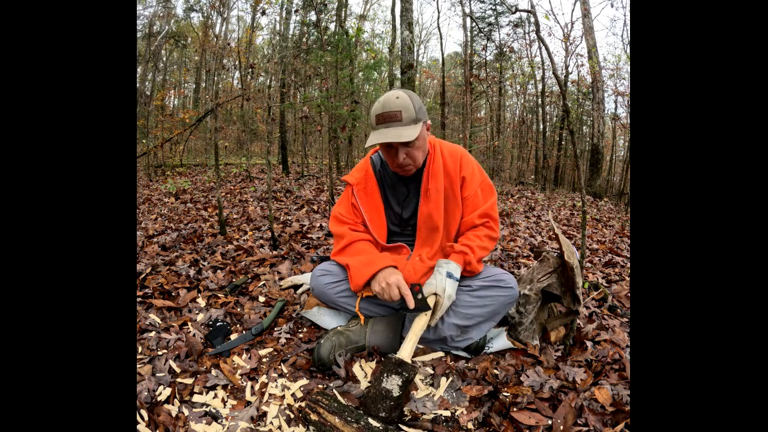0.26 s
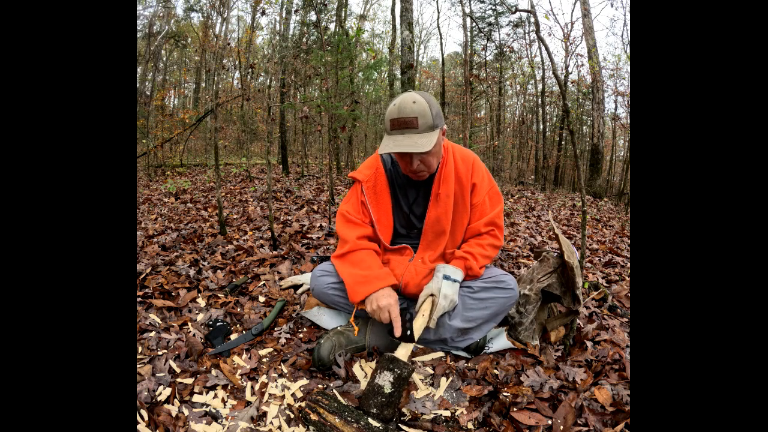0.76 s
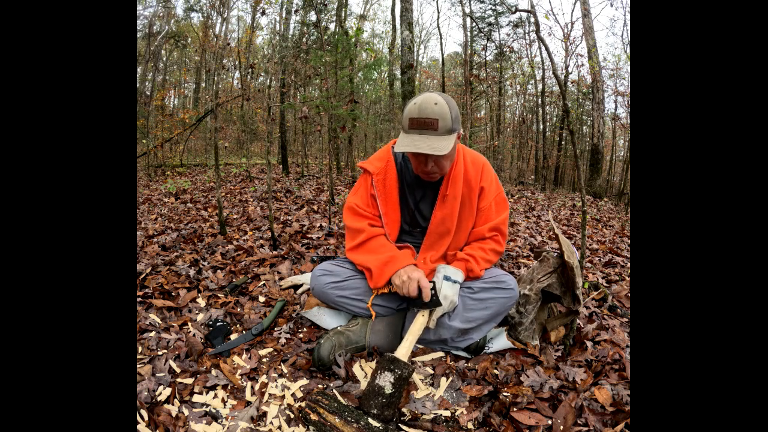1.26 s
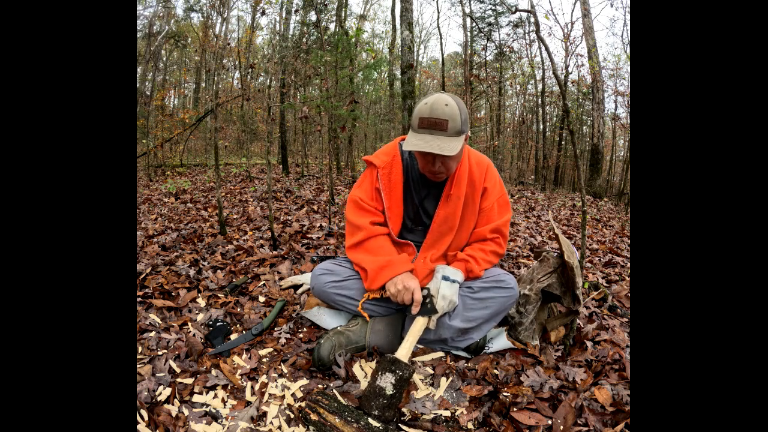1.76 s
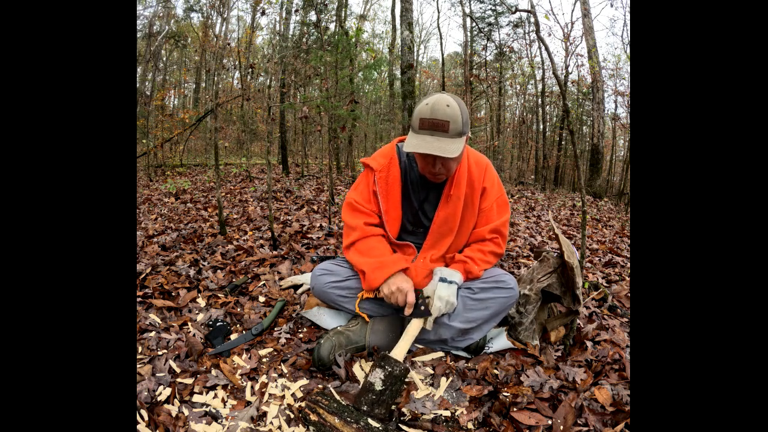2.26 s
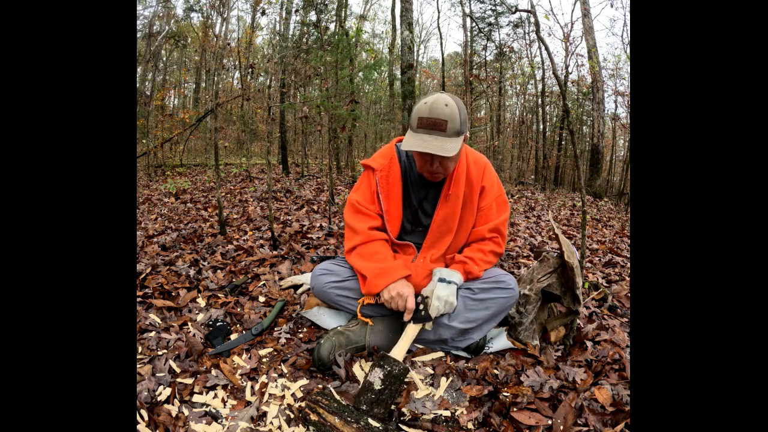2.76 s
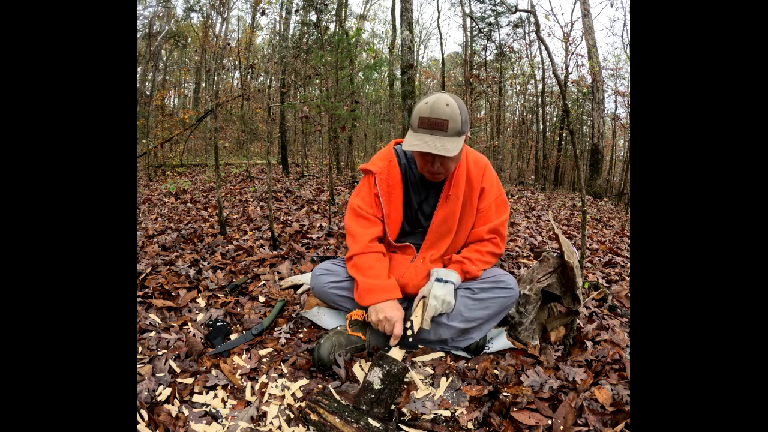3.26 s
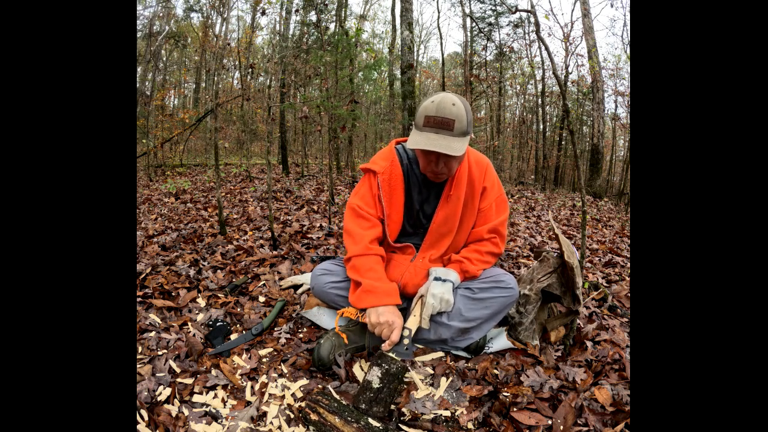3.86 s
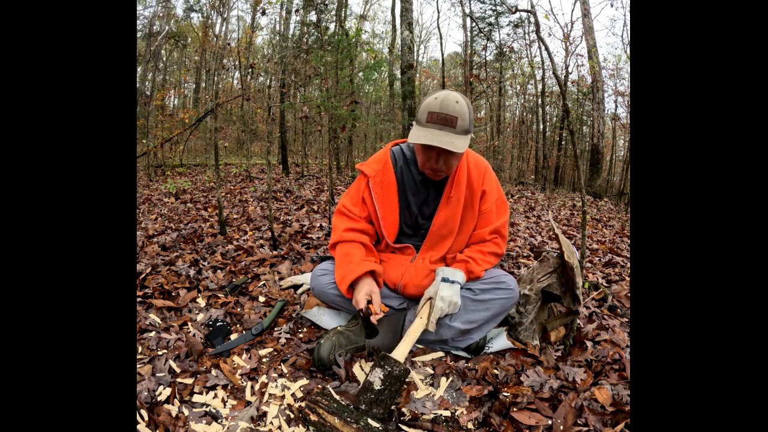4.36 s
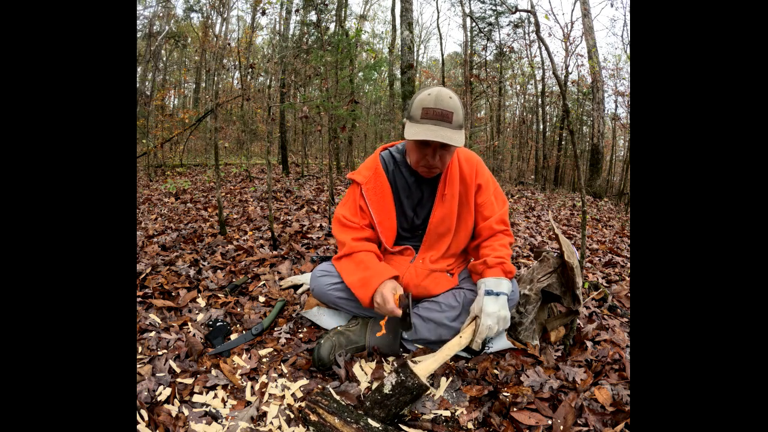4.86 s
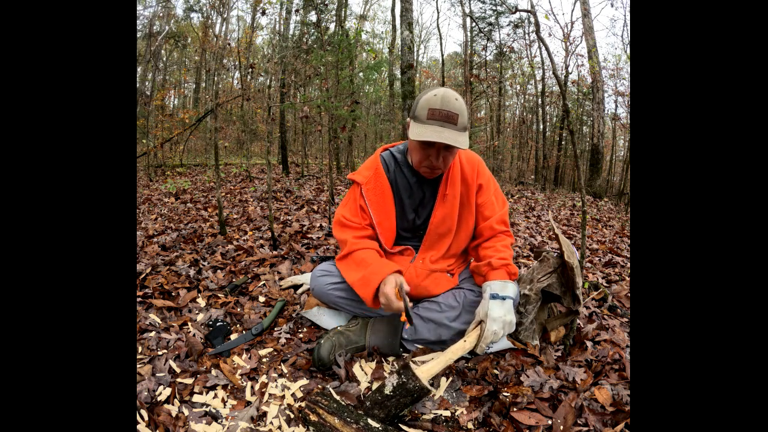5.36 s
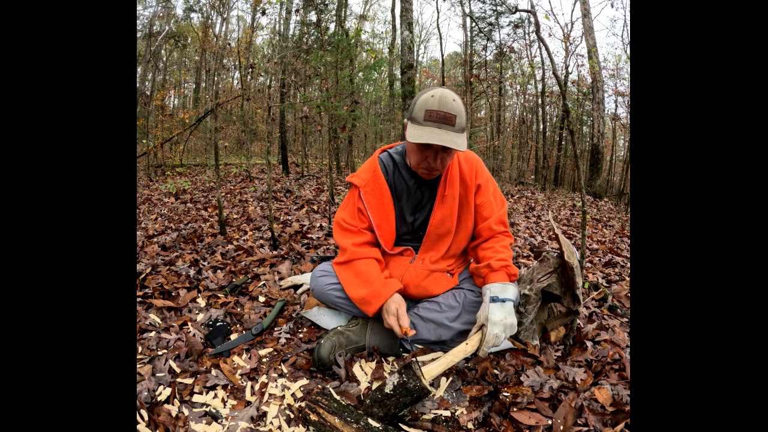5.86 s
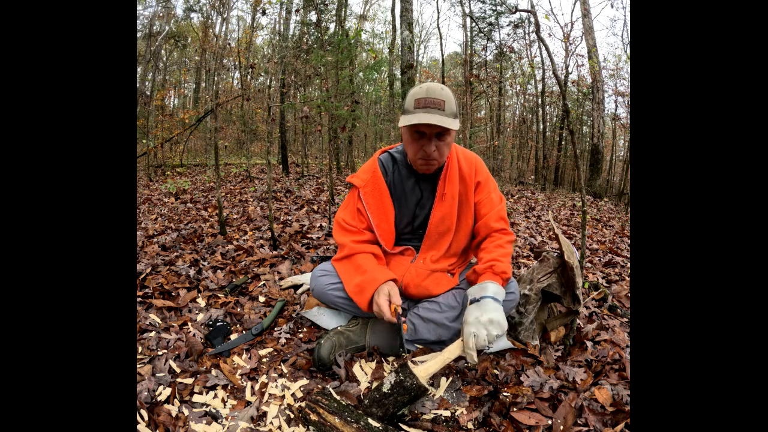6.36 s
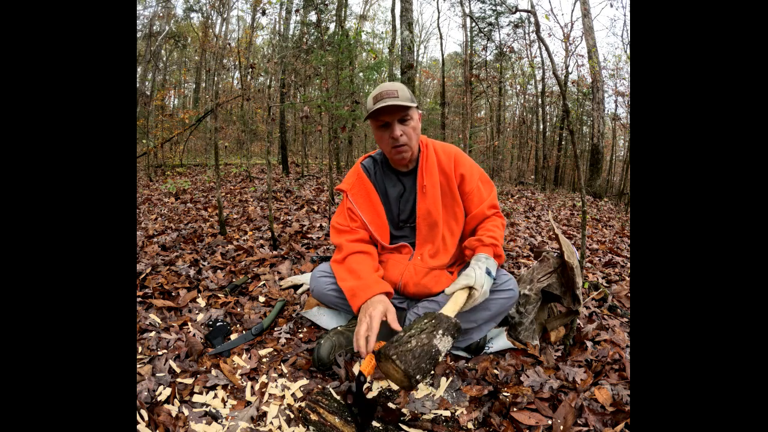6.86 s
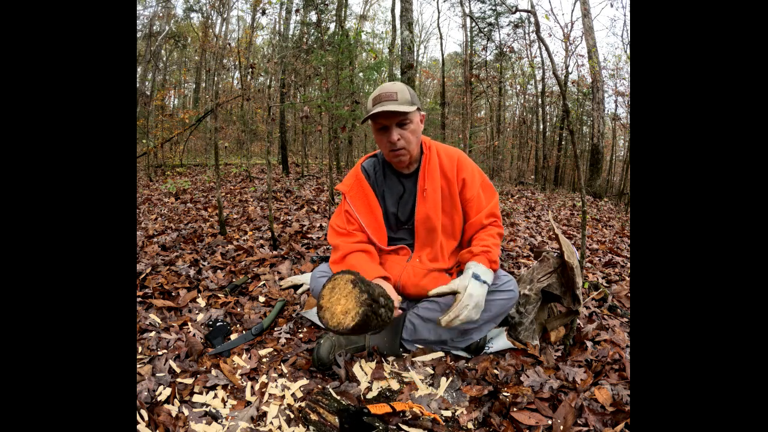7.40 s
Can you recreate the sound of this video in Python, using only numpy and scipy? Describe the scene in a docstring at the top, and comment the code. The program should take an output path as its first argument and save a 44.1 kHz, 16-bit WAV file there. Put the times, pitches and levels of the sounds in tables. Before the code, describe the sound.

Outdoors in still woods with no echo, a small hatchet taps a hardwood billet, then shaves it in short, gritty strokes with a faint steely ring. Sleeves and dry leaves rustle between moves. The strokes quicken and end in a metallic tick, the billet scuffs and bumps, a dry click leads into four chops, the middle two heaviest, and finally the lifted billet knocks. Close, dry pickup straight ahead.

```python
"""Hatchet on a billet in quiet woods

Someone sitting in fallen leaves works a hardwood billet with a small hatchet: light taps, short
shaving strokes, then a few chops. Blows ring damped modes of wood and steel and excite filtered
crackle; strokes do the same with fibres snapping in bunches. Filtered grains make the rustle of sleeves
and leaves, steady noise the hush of the woods. At the end the hatchet is put down and the billet knocks
as it is lifted."""
import sys
import numpy as np
from scipy import signal
from scipy.fft import rfft, irfft, next_fast_len
from scipy.io import wavfile
from scipy.ndimage import uniform_filter1d, minimum_filter1d

SR = 44100
rng = np.random.default_rng(int(sys.argv[2]) if len(sys.argv) > 2 else 0)


def unload_audio(sound):
    """Save the sound as a 16-bit wav file, at the path given as the first command line argument."""
    columns = np.transpose(np.atleast_2d(sound))
    # keep every value between -1 and 1, then stretch to whole-number steps
    steps = np.round(np.clip(columns, -1, 1) * 32767)
    wavfile.write(sys.argv[1], SR, steps.astype(np.int16))


N = 336483
TIME = np.arange(N) / SR
AGE = TIME[:SR // 4]  # seconds since a blow or stroke began


def from_db(db):
    """Decibels to an amplitude factor."""
    return 10 ** (np.asarray(db) / 20)


def rms_one(x):
    """Scale a sound to an RMS of one."""
    return x / np.sqrt(np.mean(x ** 2) + 1e-20)


def colour(x, spectrum):
    """Causal (minimum-phase) filter with the given spectrum, built through the cepstrum."""
    hz, db = np.transpose(spectrum)
    size = 2 * next_fast_len(len(x))
    octave = np.log2(np.maximum(np.fft.rfftfreq(size, 1 / SR), 1))
    outside = np.abs(octave - np.clip(octave, np.log2(hz[0]), np.log2(hz[-1])))
    # beyond the end points the level falls 20 dB per octave
    level_db = np.interp(octave, np.log2(hz), db) - 20 * outside
    cepstrum = irfft(np.log(from_db(level_db)))
    # folding the cepstrum forward in time makes the filter causal
    cepstrum[1:size // 2] *= 2
    cepstrum[size // 2 + 1:] = 0
    response = np.exp(rfft(cepstrum))
    return irfft(rfft(x, size) * response)[:len(x)]


def ring(force, modes, detune=1):
    """A force sets damped sines ringing, neighbours in opposite sense."""
    out = 0
    for k, (hz, db, t60) in enumerate(modes):
        decay = from_db(-60 / (t60 * SR))  # per sample
        turn = 2 * np.pi * hz * detune / SR  # radians per sample
        resonator = [1, -2 * decay * np.cos(turn), decay * decay]
        mode = signal.lfilter([np.sin(turn)], resonator, force + 1e-18)
        out = out + (-1) ** k * from_db(db) * mode
    return out


def snaps(per_s, spread_db, size=N):
    """Random tiny fractures: many weak, a few strong."""
    sizes = from_db(spread_db * np.minimum(rng.exponential(1, size), 4))
    happens = rng.random(size) < per_s / SR
    return happens * sizes * rng.choice([-1, 1], size)


def contact(grit, t60, bite=0.0012):
    """Force of one blow: a sharp push, then a crackle of crushed fibres that swells as the edge bites and dies."""
    swelling = 1 - np.exp(-AGE / bite)
    crackle = rng.standard_normal(len(AGE)) * from_db(-60 * AGE / t60) * swelling
    return (AGE == 0) + grit * crackle / np.linalg.norm(crackle)


def add(track, s, db, sound):
    """Place a blow; its level is its energy spread over 3 ms."""
    start = round(s * SR)
    sound = from_db(db) * sound / np.linalg.norm(sound) * np.sqrt(.003 * SR)
    track[start:start + len(sound)] += sound[:N - start]


def swell(s, length):
    """A smooth bell-shaped rise and fall around one moment."""
    return np.exp(-2 * ((TIME - s) / length) ** 2)


def blunt_blows(events, modes, gain_db, grit):
    """Blunt blows on one wooden body set its modes ringing."""
    out = np.zeros(N)
    for s, level_db in events:
        add(out, s, level_db + gain_db, ring(contact(grit, t60=0.0053), modes))
    return out


# Spectra of the air in the trees and of the faint hiss.
# Each row: frequency in Hz, relative level in dB per Hz.
WOODS = [(15, -71), (25, -7), (98, -2), (344, 0), (462, -1.5), (543, 1.5), (952, -5), (1120, -4),
         (1210, -4.5), (1810, -4.5), (2930, -3.5), (6540, -12.5), (9020, -29), (11500, -26), (15000, -60)]
HISS = [(3000, -15), (6000, -5), (10500, -2), (12500, 8.5), (14000, -27)]
WOODS_DB, HISS_DB = -49.5, -83  # RMS


def woods():
    """Even hush of air in the trees, with a faint hiss of opposite polarity in the two ears."""
    hush = from_db(WOODS_DB) * rms_one(colour(rng.standard_normal(N), WOODS))
    hiss = from_db(HISS_DB) * rms_one(colour(rng.standard_normal(N), HISS))
    return hush + hiss * np.array([[1], [-1]])


# Sleeves and leaves brush with each movement.
# Each row: peak in seconds, level in dB before trim, rise in seconds, fall in seconds.
RUSTLES = [(0.07, -42.5, 0.094, 0.057), (0.39, -47, .06, 0.14), (0.565, -45.5, .02, 0.033),
           (0.80, -45, 0.046, 0.048), (0.99, -44.5, 0.11, 0.086), (1.33, -47, 0.1, 0.078),
           (1.56, -48.5, 0.053, 0.06), (1.79, -43.5, 0.051, 0.042), (1.985, -53, .015, .06),
           (4.53, -37.5, .14, .11), (4.831, -48, 0.26, .03), (6.47, -44, 0.072, .045),
           (7.13, -43, .012, 0.036), (7.335, -40.5, 0.15, 0.048), (7.6, -53, 0.12, .1)]
# Dry leaves and chips are crushed. Each row: centre in seconds, level in dB, swell length in seconds.
CRUNCHES = [(0.082, -41, 0.024), (0.892, -45.5, 0.018), (4.225, -46, .022), (5.664, -41, 0.01),
            (6.37, -45, 0.027), (7.102, -39, 0.0072), (7.114, -30.5, 0.004), (7.121, -33, 0.0077)]
# Spectrum of brushing cloth and leaves. Each row: frequency in Hz, relative level in dB per Hz.
BRUSH = [(200, -10.5), (700, -7), (1400, -1.5), (2800, -1), (4500, -3.5), (7000, -16), (9000, -29.5),
         (11200, -23), (13000, -41), (14500, -48)]


def rustle():
    """Cloth brushes as each movement gathers speed and dies away; dry leaves give way in short grainy swells."""
    power = 0
    for s, db, rise, fall in RUSTLES:
        away = np.maximum((s - TIME) / rise, (TIME - s) / fall).clip(max=20)
        power = power + (from_db(db) * np.exp(-away)) ** 2
    speed = np.sqrt(power)
    cloth = from_db(-0.22) * speed * rms_one(colour(snaps(per_s=12000, spread_db=3.5), BRUSH))
    crush = sum(from_db(db) * swell(s, length) for s, db, length in CRUNCHES)
    return cloth + crush * rms_one(colour(snaps(per_s=5000, spread_db=3.0), BRUSH))


# The edge taps and catches on the billet. Each row: start in seconds, then levels in dB before trim
# for wood, steel ring, high steel ring and tick.
TAPS = [(0.4155, -28, -24.5, -42.5, -32.5), (0.629, -36, -28, -65, -46), (1.0162, -21, -17, -25.5, -24.5),
        (1.511, -38.5, -38, -51, -51), (2.129, -53, -36, -50, -44), (2.463, -42, -37, -59, -55),
        (2.633, -43, -47, -63, -56), (3.074, -59, -19, -63, -58), (3.181, -46, -34, -40.5, -50),
        (3.513, -40.5, -34, -51, -50), (3.602, -57, -29, -52, -47), (3.616, -55, -19, -43, -59),
        (3.755, -36, -33.5, -63, -65), (3.786, -56, -28, -60, -63), (3.867, -46, -17.5, -44, -49),
        (3.875, -45, -20, -40, -54), (3.91, -26.5, -11, -35, -31), (7.035, -36, -25.5, -47, -32.5)]
# Modes of the tapped billet, and of the free hatchet's lower and high ring.
# Each row: frequency in Hz, relative level in dB, 60 dB decay in seconds.
BILLET_TAPPED = [(410, 1.5, 0.044), (663, 5.5, 0.037), (864, -6.5, 0.086), (1260, 2.5, 0.026),
                 (1540, 2, 0.03), (1910, 4.5, 0.0083)]
HATCHET = [(2753, 4, 0.028), (2755, 8, 0.013), (2962, 3.5, 0.033), (3210, -17, 0.034), (3280, -14, 0.0056),
           (3870, -6.5, 0.016)]
HATCHET_HIGH = [(5827, 4, 0.029), (6090, 2, 0.035), (9240, -12, 0.028), (9280, -31, 0.013),
                (11000, -33, 0.047)]
# Spectrum of the tick. Each row: frequency in Hz, relative level in dB per Hz.
TICK = [(400, 8), (900, 5), (1400, -7), (2100, -9.5), (3000, 16), (3900, 11.5), (4800, -1.5), (7500, -10.5),
        (9000, -17), (11000, -21), (16000, -29)]


def taps():
    """A light touch gives a sharp tick and leaves the steel free to ring."""
    out = np.zeros(N)
    for s, wood_db, steel_db, high_db, tick_db in TAPS:
        force = contact(grit=.25, t60=.014)
        add(out, s, wood_db - 0.5, ring(force, BILLET_TAPPED))
        add(out, s, steel_db - 5.0, ring(force, HATCHET))
        add(out, s, high_db + 3.0, ring(force, HATCHET_HIGH))
        add(out, s, tick_db + 7.0, colour(contact(grit=1.1, t60=.016), TICK))
    return out


# Spectrum of the slip's wander. Each row: frequency in Hz, relative level in dB per Hz.
SLIP = [(30, -3), (70, 0), (200, -3), (400, -18)]


def tearing(size):
    """Fibres snap in bunches as the edge sticks and slips."""
    slip_db = 3.0 * rms_one(colour(rng.standard_normal(size), SLIP))
    return snaps(per_s=7000, spread_db=2.8, size=size) * from_db(np.minimum(slip_db, 5))


# Shaving strokes. Each row: start in seconds, length in seconds to the middle of the release, deepest bite
# as a share of the length, bite half-width in seconds, pitch ratio of the high ring, then levels in dB
# before trim for tearing fibres, steel ring, high steel ring, woody rasp and billet rumble.
STROKES = [ (0.596, .150, 0.58, .035, 1.02, -46, -36, -49.5, -40, -40.5),
           (1.193, 0.074, 0.58, 0.028, 1.01, -58, -45.5, -54, -64, -58),
           (2.125, 0.12, 0.44, 0.037, 0.88, -42.5, -34, -53, -37, -49.5),
           (2.268, 0.15, 0.37, 0.029, 1, -47, -36.5, -55, -45.5, -50),
           (2.418, .118, .56, 0.028, 1.014, -46, -35.5, -48.5, -40.5, -42.5),
           (2.563, 0.14, 0.56, 0.027, 1.02, -45, -34.5, -51, -45, -45),
           (2.712, 0.056, 0.3, .03, 1.07, -47, -52, -54, -46.5, -71),
           (2.885, 0.084, 0.5, .02, 1.0, -51, -44, -62, -53, -61),
           (3.014, 0.14, 0.52, 0.025, 1.0, -45, -33, -51, -39, -40.5),
           (3.145, 0.071, 0.65, 0.031, 1.03, -48.5, -47, -45, -47, -46.5),
           (3.209, .048, 0.46, 0.015, 1.04, -47.5, -41, -56, -45.5, -50),
           (3.275, 0.099, 0.62, 0.023, 1.01, -43.5, -30.5, -42.5, -42.5, -41.5),
           (3.477, 0.065, 0.69, .014, 1.05, -53, -38.5, -53, -52, -54),
           (3.582, 0.093, 0.35, 0.015, 0.96, -45, -34.5, -50, -46, -41.5),
           (3.751, 0.076, 0.37, 0.023, 1.0, -56, -42.5, -55, -56, -45),
           (3.853, 0.05, .52, 0.017, 1.0, -41.5, -28.5, -44, -45, -41),
           (3.897, 0.025, 0.46, .010, 1.06, -38, -32, -36, -40, -39.5), ]
# Spectra of tearing fibres and billet rumble. Each row: frequency in Hz, relative level in dB per Hz.
FIBRES = [(900, -9.5), (1500, -12.5), (2400, -0.5), (3300, -0.5), (3770, 2.5), (4600, -5), (7000, -11.5),
          (8600, -28.5), (11000, -22), (15500, -46.5)]
RUMBLE = [(30, -27), (75, -4), (170, -12.5), (270, -2), (380, -5.5), (550, 0), (750, -1.5), (1000, -13.5),
          (1600, -21)]
# Modes of the blade pressed into the wood, its high ring (before the pitch ratio), and the rasped billet.
# Each row: frequency in Hz, relative level in dB, 60 dB decay in seconds.
BLADE_PRESSED = [(2754, -3, 0.015), (2919, 0.5, 0.084), (3050, -1.5, .015)]
BLADE_PRESSED_HIGH = [(5825, 4.5, 0.072), (6030, 9, 0.011), (8900, 1, 0.026)]
BILLET_RASPED = [(1504, -4.5, 0.017), (1710, -6.5, 0.014), (1943, 1, 0.024), (2470, -2, 0.0071)]
STROKE_ATTACK_S, STROKE_RELEASE_S = 0.0089, 0.039  # the edge enters and leaves the wood
# how closely each sound follows the depth of the bite (exponents)
FIBRES_FOLLOW, STEEL_FOLLOWS, ZING_FOLLOWS = 0.21, 1.06, 0.71
RASP_FOLLOWS, RUMBLE_FOLLOWS = 0.77, 0.87


def shaving():
    """In each stroke the edge enters, bites deepest once and leaves; the tearing shakes blade and billet."""
    out = np.zeros(N)
    for s, length, deepest, width, pitch, fibres_db, steel_db, high_db, rasp_db, rumble_db in STROKES:
        entering = AGE / STROKE_ATTACK_S
        leaving = (length - AGE) / STROKE_RELEASE_S + .5
        touch = np.clip(np.minimum(entering, leaving), 0, 1)
        bite = 1 / (1 + ((AGE - deepest * length) / width) ** 2)
        force = tearing(size=len(AGE))
        layers = [(fibres_db + 3.0, FIBRES_FOLLOW, colour(force, FIBRES)),
                  (steel_db - 1.5, STEEL_FOLLOWS, ring(force, BLADE_PRESSED)),
                  (high_db - 1.0, ZING_FOLLOWS, ring(force, BLADE_PRESSED_HIGH, pitch)),
                  (rasp_db + 0.26, RASP_FOLLOWS, ring(force, BILLET_RASPED)),
                  (rumble_db - 0.7, RUMBLE_FOLLOWS, colour(force, RUMBLE))]
        stroke = sum(from_db(db) * bite ** follows * rms_one(sound) for db, follows, sound in layers)
        start = round(s * SR)
        out[start:start + len(AGE)] += touch * stroke
    return out


# The billet shifts and bumps on its block. Each row: start in seconds, level in dB before trim.
BUMPS = [(1.513, -42), (3.345, -32.5), (3.370, -32), (3.632, -41), (3.645, -32.5), (3.776, -44),
         (4.029, -38), (4.236, -37), (5.012, -33.5), (6.923, -36), (7.038, -25.5), (7.277, -47)]
# Modes of the block. Each row: frequency in Hz, relative level in dB, 60 dB decay in seconds.
BLOCK = [(173, -10, 0.086), (262, 0, 0.043), (338, 4, 0.031), (530, 7, 0.0059)]


def bumps():
    """Soft bumps of the billet sound the low modes of the block."""
    return blunt_blows(BUMPS, BLOCK, gain_db=0.3, grit=0.3)


# The billet scuffs as it is turned. Each row: centre in seconds, swell length in seconds,
# low grating in dB before trim, hollow grating in dB before trim.
SCUFFS = [(4.027, 0.029, -52, -63), (4.204, 0.098, -48.5, -65), (4.28, 0.02, -49, -40)]


def handling():
    """The billet is turned and scuffs on its block: sparse snaps ring both with a dull, hollow grating."""
    grating = snaps(per_s=920, spread_db=6.0)
    low = rms_one(ring(grating, BLOCK[1:]))
    hollow = rms_one(ring(grating, BILLET_TAPPED[1:3], detune=1.18))
    out = 0
    for s, length, low_db, hollow_db in SCUFFS:
        out = out + swell(s, length) * (from_db(low_db) * low + from_db(hollow_db) * hollow)
    return from_db(-1.0) * out


# Dry clicks of wood on wood. Each row: start in seconds, level in dB before trim.
CLICKS = [(5.0052, -21), (6.922, -41)]
# Modes of the click. Each row: frequency in Hz, relative level in dB, 60 dB decay in seconds.
CLICK_MODES = [(578, -5, 0.023), (780, -4.5, 0.026), (1415, 0.5, 0.014), (2120, 6.5, 0.0057),
               (2630, 5, 0.0043)]


def clicks():
    """Wood meets wood with little grit, so short modes click dryly."""
    return blunt_blows(CLICKS, CLICK_MODES, gain_db=-0.5, grit=0.098)


# Chops into the billet. Each row: start in seconds, then levels in dB before trim for thud, crack,
# steel ring, high steel ring and splinters.
CHOPS = [(5.1216, -17.5, -30.5, -41, -37, -37.5), (5.5219, -5.5, -13.5, -16, -27.5, -36),
         (5.9452, -6, -5.5, -11.5, -43, -34), (6.2505, -16.5, -18.5, -34, -18, -26)]
# Modes of the held billet and of the hatchet sunk in it.
# Each row: frequency in Hz, relative level in dB, 60 dB decay in seconds.
BILLET_HELD = [(169, -9.5, 0.047), (268, -0.5, 0.028), (411, 1.5, 0.02), (557, 1.5, 0.029),
               (787, -0.5, 0.015), (1070, -10, 0.012)]
HATCHET_SUNK = [(2630, -4, 0.002), (3020, -6, 0.023), (3450, 6.5, 0.0057), (3900, 0.5, 0.0049),
                (4930, -24, 0.009)]
# Spectra of splitting grain and of splinters. Each row: frequency in Hz, relative level in dB per Hz.
CRACK = [(500, -27.5), (680, 3), (820, 5.5), (1080, 3), (1400, -11.5), (1900, -6.5), (2600, -19),
         (4200, -15.5), (7000, -26), (12000, -53)]
SPLINTERS = [(2500, 1), (4000, 9.5), (5000, -5), (6500, 0), (8000, -4), (9000, -7), (10300, -6),
             (11800, -10), (13500, -18), (16000, -34)]


def chops():
    """The edge bites: a short thud of the held billet, a crack of splitting grain, a choked ring of steel."""
    out = np.zeros(N)
    for s, thud_db, crack_db, steel_db, high_db, splinter_db in CHOPS:
        add(out, s, thud_db + 0.11, ring(contact(grit=0.1, t60=0.011), BILLET_HELD))
        split = contact(grit=.55, t60=.012)
        add(out, s, crack_db - 0.5, colour(split, CRACK))
        add(out, s, steel_db - 0.5, ring(split, HATCHET_SUNK))
        splintering = contact(grit=5.0, t60=0.012, bite=0.0027)
        add(out, s, high_db - 0.5, ring(splintering, HATCHET_HIGH, detune=1.02))
        add(out, s, splinter_db + 5.5, colour(splintering, SPLINTERS))
    return out


# The freed billet knocks and rings. Each row: start in seconds, level in dB before trim.
KNOCKS = [(7.0477, -12)]
# Modes of the free billet. Each row: frequency in Hz, relative level in dB, 60 dB decay in seconds.
BILLET_FREE = [(166, -17, 0.05), (324, -19, 0.15), (450, -15, 0.037), (590, -8, 0.026), (757.6, 1.5, 0.062),
               (764, -13, 0.2), (990, -9, 0.1), (1150, 0.5, 0.013), (1460, -26, 0.083), (1580, 2, 0.0085),
               (2960, -22, 0.084)]
# Spectrum of crunching bark. Each row: frequency in Hz, relative level in dB per Hz.
BARK = [(800, -8), (1400, 2.5), (2000, -11), (2800, 2.5), (4200, -13), (6000, -10), (8000, -28),
        (12000, -36)]


def lifting():
    """Freed from the block, the billet knocks with a longer ring, and its bark crunches."""
    out = blunt_blows(KNOCKS, BILLET_FREE, gain_db=0.3, grit=0.35)
    for s, level_db in KNOCKS:
        add(out, s, level_db - 9.5, colour(contact(grit=1.2, t60=0.041), BARK))
    return out


def scene():
    """All the work happens straight ahead; the leaf litter gives no echo."""
    background = woods() + rustle()
    cutting = taps() + shaving() + chops()
    moving_billet = bumps() + handling() + clicks() + lifting()
    return background + cutting + moving_billet


def low_cut_and_notch(x, low_cut_hz=35, notch_hz=9100, notch_q=14):
    """A gentle low cut removes the deepest bass; a narrow notch thins the treble near 9.1 kHz."""
    x = signal.lfilter(*signal.butter(1, low_cut_hz, "high", fs=SR), x)
    return signal.lfilter(*signal.iirnotch(notch_hz, notch_q, fs=SR), x)


CUTOFF_HZ = 15800


def record(dry, ceiling_db=-5.0, release_db_per_s=35):
    """A look-ahead limiter ducks peaks above the ceiling and recovers slowly; the top is cut."""
    dry = low_cut_and_notch(dry)
    peak_db = 20 * np.log10(np.abs(dry).max(axis=0) + 1e-9)  # the louder ear steers both
    over = np.maximum(peak_db - ceiling_db, 0)
    recovery = release_db_per_s * TIME
    held = np.maximum.accumulate(over + recovery) - recovery
    # centred windows let the gain move ahead of the peak
    duck_db = uniform_filter1d(minimum_filter1d(-held, size=129), size=129)
    top_cut = signal.ellip(10, .1, 80, CUTOFF_HZ, fs=SR, output="sos")
    return signal.sosfilt(top_cut, dry * from_db(duck_db))


dry = scene()
out = record(dry)
unload_audio(out)
```